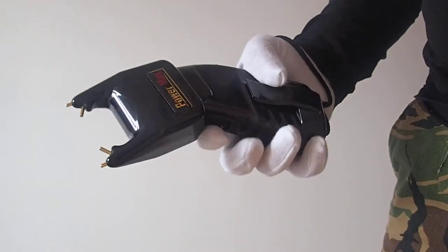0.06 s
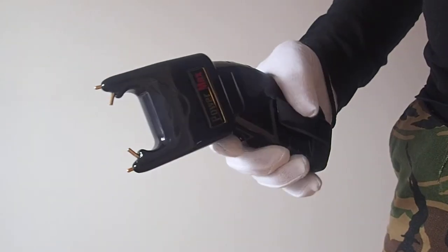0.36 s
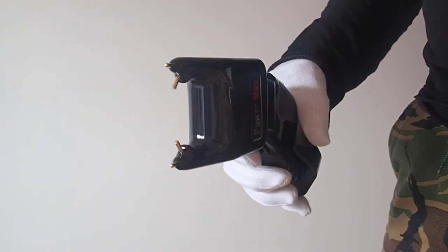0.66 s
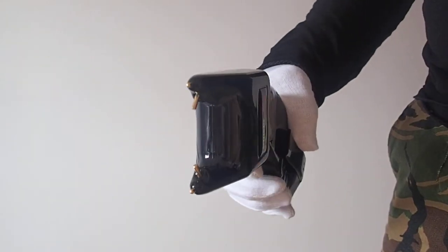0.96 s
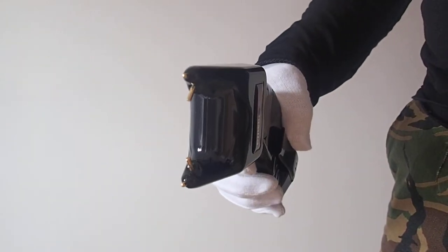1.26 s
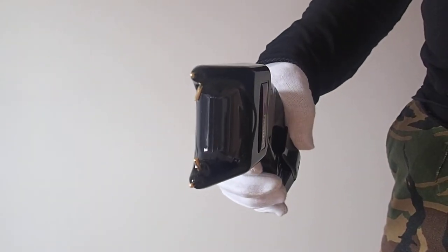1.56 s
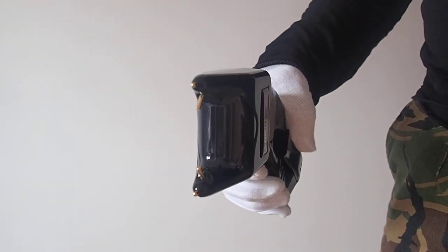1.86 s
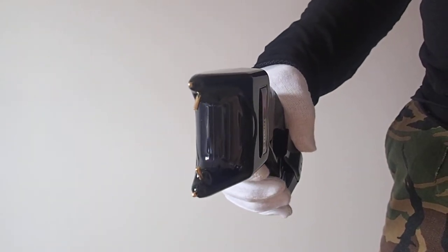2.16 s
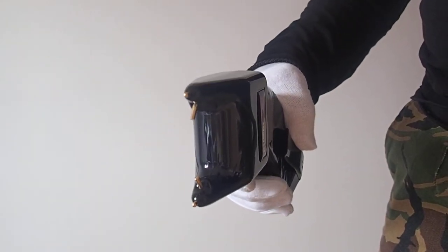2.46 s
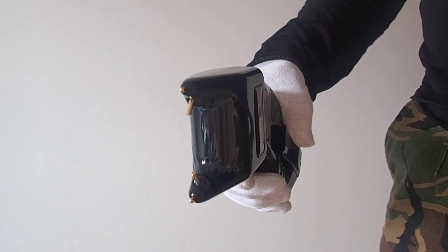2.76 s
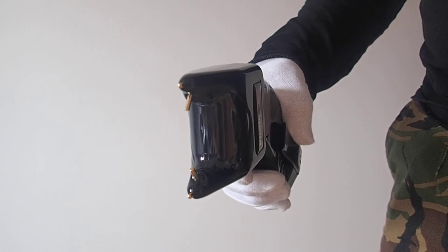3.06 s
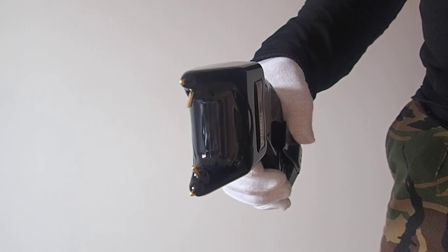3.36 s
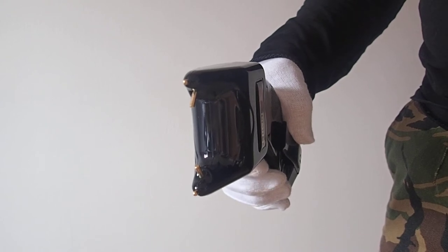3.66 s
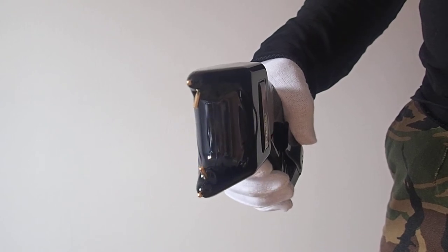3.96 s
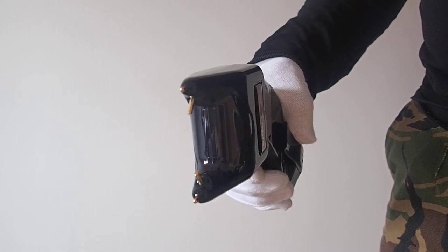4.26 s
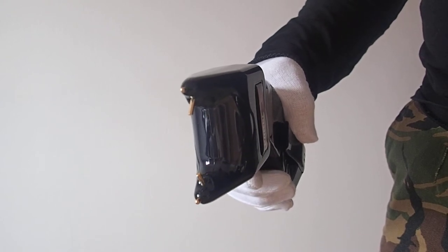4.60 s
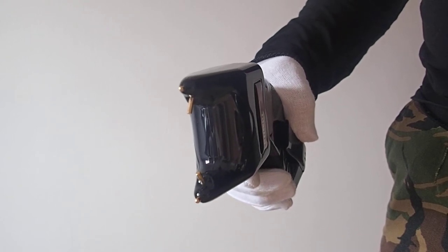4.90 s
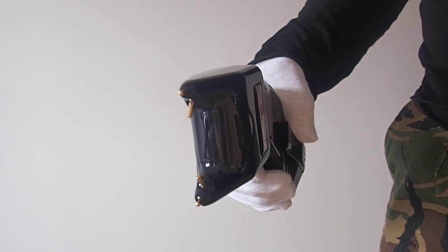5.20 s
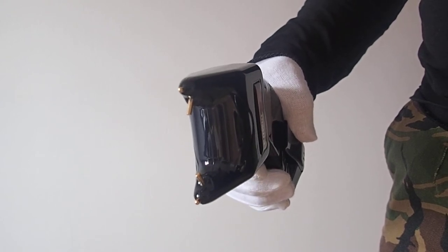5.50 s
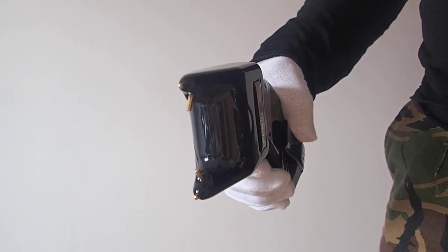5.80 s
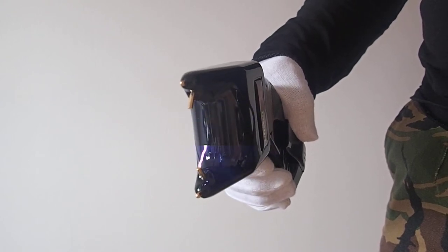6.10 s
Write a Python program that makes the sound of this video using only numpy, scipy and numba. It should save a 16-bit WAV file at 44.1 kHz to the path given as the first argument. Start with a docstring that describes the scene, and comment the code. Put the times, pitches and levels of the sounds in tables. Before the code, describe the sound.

Three brief bursts of sharp, rattling stun gun sparks, separated by pauses with faint hiss, each leaving a short room echo.

```python
"""A stun gun fires three short bursts close to a microphone in a small, hard-walled room.
Some forty sparks a second jump the gap; each crack glances off the casing and rings the room and
the microphone's ports. Trigger and grip click before each burst, over a steady hiss. A burst's first
crack overloads the recorder, whose gain control ducks, holds and recovers during the echo."""
import sys
import numpy as np
from scipy import signal
from scipy.fft import rfft, irfft
from scipy.io import wavfile
from numba import njit

SR = 44100
rng = np.random.default_rng(int(sys.argv[2]) if len(sys.argv) > 2 else 0)


def file_out(sig):
    """Save sig as 16-bit WAV at sys.argv[1]."""
    # one column per channel
    cols = np.atleast_2d(sig).T
    # limit, then scale
    lim = np.clip(cols, -1, 1)
    pcm = np.round(lim * 32767).astype(np.int16)
    wavfile.write(sys.argv[1], SR, pcm)


N = 270774


# hard cracks and their rattles: (time [s], crack level [dB], thud level [dB], rattle wait [s],
# rattle length [s], first recharge [s], rattle thud maximum [dB])
HARD_CRACKS = [(2.0285, 8.5, 18.5, .028, .235, .0205, 8), (2.3325, 1.7, 12.5, 0, 0, 0, 0),
               (3.7356, 8, 18.5, .039, .2, .0225, 10), (3.9893, -2.5, 5.5, .0225, .165, 0.029, -3),
               (5.9455, 6.5, 17, .0265, .153, .0229, 7.5)]

def discharges(slowing_s=.0003, jitter_s=.0014, full_charge_db=2, charge_tau_s=0.017,
               thud_fade_db_per_s=14, thud_spread_db=16, count=16):
    """Spark list (time [s], level [dB], thud [dB]): a hard crack, then the gap fires at each recharge."""
    k = np.arange(count)
    rows = []
    draws = rng.standard_normal((len(HARD_CRACKS), 2, count))
    for crack, (jitter, shortfall) in zip(HARD_CRACKS, draws):
        start_s, crack_db, thud_db, wait_s, length_s, recharge_s, max_thud_db = crack
        due_s = k * recharge_s + slowing_s * k * (k - 1) / 2  # each recharge takes longer
        times_s = start_s + wait_s + due_s + jitter_s * jitter
        gaps_s = np.abs(np.diff(times_s, prepend=start_s))
        charge = 1 - np.exp(-gaps_s / charge_tau_s)
        levels_db = full_charge_db + 20 * np.log10(charge)
        thuds_db = max_thud_db - thud_fade_db_per_s * due_s - thud_spread_db * np.abs(shortfall)
        rattle = np.c_[times_s, levels_db, thuds_db]
        rows.append((start_s, crack_db, thud_db))
        rows.extend(rattle[(due_s < length_s) & (times_s < N / SR)])
    return rows


# thud of a close spark on the microphone: (frequency [Hz], relative level [dB])
THUD_SPECTRUM = [(40, 1), (250, 2), (550, 2), (1200, 1), (2000, 4.5), (2800, -10.5), (3800, -3), (5000, -5),
                 (10000, -32)]

def sparks(smear_db=-6, smear_s=0.00033, thud_gain_db=1, thud_scatter_db=3, size=128, count=64):
    """Each spark is a shock, smeared by its crooked channel, and a thud, uneven on the two ports."""
    t = np.arange(size) / SR
    shocks, thuds = np.zeros(N), np.zeros((2, N))
    for (time_s, level_db, thud_db), noise in zip(discharges(), rng.standard_normal((count, size))):
        smear = unit(noise * (t > 0) * np.exp(-t / smear_s))
        shock = (t == 0) + undb(smear_db) * smear
        add(shocks, time_s, undb(level_db) * unit(shock))
        balance = undb(thud_scatter_db * noise[0] * np.array([[1], [-1]]))
        add(thuds, time_s, undb(thud_db + thud_gain_db) * unit(balance))
    return shocks, convolve(thuds, response(THUD_SPECTRUM))


# trigger and grip clicks: (time [s], level [dB], ring frequency [Hz])
TRIGGER_CLICKS = [(1.679, -33, 4450), (1.882, -28.5, 7360), (1.9987, -9, 8230), (3.619, -32, 5700),
                  (3.6368, -27.5, 7640), (3.704, -26.5, 5020), (5.815, -37, 5750), (5.826, -39, 6200),
                  (5.922, -27.5, 5300)]

def trigger(decay_s=0.00018, scrape_s=.0003, scrape_db=-6, size=256):
    """Plastic snaps: a very short ring plus a scrape."""
    t = np.arange(size) / SR
    clicks = np.zeros(N)
    noises = rng.standard_normal((len(TRIGGER_CLICKS), size))
    for (time_s, level_db, hz), noise in zip(TRIGGER_CLICKS, noises):
        scrape = undb(scrape_db) * unit(noise * np.exp(-t / scrape_s))
        add(clicks, time_s, undb(level_db) * unit(ring(t, hz, decay_s) + scrape))
    return clicks


# microphone port resonances, left then right: (frequency [Hz], level [dB])
PORT_RINGS = [(5650, -21.5), (5850, -12.5)]
# reflections off casing, hand, body and walls: (delay [s], level [dB])
REFLECTIONS = [(.00036, -7), (.00088, -5), (.0039, -9.5), (.0105, -25.5), (.0146, -28.5), (.0168, -23),
               (.0198, -16)]

def near_paths(port_decay_s=0.0007, skew_s=.000035, size=2048):
    """Direct sound rings each port; early reflections reach the two ports slightly apart."""
    t = np.arange(size) / SR
    decay = np.exp(-t / port_decay_s)
    paths = np.array([(t == 0) + undb(db) * unit(np.cos(2 * np.pi * hz * t) * decay)
                      for hz, db in PORT_RINGS])
    bins_hz = np.fft.rfftfreq(size, 1 / SR)
    for k, (delay_s, db) in enumerate(REFLECTIONS):
        arrival_s = delay_s + (-1) ** k * skew_s * np.array([[-.5], [.5]])
        paths += undb(db) * irfft(np.exp(-2j * np.pi * bins_hz * arrival_s))
    return paths


# echo width: (frequency [Hz], side re mid [dB])
ECHO_WIDTH = [(200, 2), (700, -9), (1300, -19), (2400, -76), (4400, -4), (8100, -8.5), (15000, 2)]
# wall colouring: (frequency [Hz], relative level [dB])
WALL_SPECTRUM = [(900, 1.5), (1500, -0.5), (2400, -0.5), (4100, -2), (5250, 6), (6600, 2), (8000, 0),
                 (13000, -5)]
# reverberation time: (frequency [Hz], T60 [s])
ECHO_T60 = [(300, .6), (1500, 0.86), (3000, 0.76), (5300, 0.6), (8000, 0.56), (11000, 0.41), (15500, 0.4)]
# lingering resonances: (frequency [Hz], relative level [dB])
ECHO_MODES = [(2283, -5), (3095, -7.5), (4667, -3.5), (4989, 3.5), (5119, -16), (5238, -12.5), (5700, -12),
              (5756, -5.5), (7760, -18.5)]

def room(wet_db=-2, build_s=0.019, clump_db=2.5, clump_samples=50, modes_db=-16, modes_t60_s=0.7):
    """Diffuse echo: builds in clumps of reflections, dies soonest in the treble, leaves modes ringing."""
    t = np.arange(SR) / SR
    mid, side = rng.standard_normal((2, SR))
    stereo = mid + tint(side, ECHO_WIDTH) * np.array([[1], [-1]])
    clump_levels_db = clump_db * rng.standard_normal(SR // clump_samples + 1)
    clumps = undb(np.repeat(clump_levels_db, clump_samples)[:SR])
    spectrum = rfft(tint(clumps * stereo, WALL_SPECTRUM))
    centres_hz, t60s_s = np.transpose(ECHO_T60)
    tail = 0
    for weights, t60_s in zip(np.eye(len(t60s_s)), t60s_s):
        band = irfft(spectrum * curve(np.c_[centres_hz, weights], SR))
        tail = tail + band * np.exp(-np.log(1000) * t / t60_s)
    modes = sum(undb(db) * ring(t, hz, modes_t60_s / np.log(1000)) for hz, db in ECHO_MODES)
    tail = unit(tail) + undb(modes_db) * unit(modes)
    return undb(wet_db) * unit(tail * (1 - np.exp(-t / build_s)))


# noise floor: (frequency [Hz], relative density [dB])
HISS_SPECTRUM = [(25, -16), (126, -2), (495, -1.5), (1170, -4), (1700, -7.5), (2150, -11), (2700, -19.5),
                 (3150, -14.5), (3650, -19.5), (3950, -26.5), (4600, -14.5), (5200, -10.5), (7200, -9),
                 (7950, -5), (9300, -13), (15500, -15)]

def hiss(left_db=-49.5, right_db=-52.33, shared_db=-9):
    """Steady microphone hiss and room air, mostly uncorrelated between channels."""
    noise = rng.standard_normal((3, N))
    stereo = tint(noise[:2] + undb(shared_db) * noise[2], HISS_SPECTRUM)
    return unit(stereo) * np.sqrt(N) * undb([[left_db], [right_db]])


def undb(db):
    """Decibels to gain."""
    return 10 ** (np.asarray(db) / 20)


def unit(x):
    """Scale to a mean channel energy of one."""
    return x / np.sqrt(np.mean(np.sum(x ** 2, axis=-1)))


def curve(points, size):
    """Interpolate (frequency [Hz], value) points at every FFT bin."""
    hz, value = np.transpose(points)
    return np.interp(np.log(np.fft.rfftfreq(size, 1 / SR) + 1), np.log(hz), value)


def tint(x, points):
    """Filter by (frequency [Hz], level [dB]) points."""
    return irfft(rfft(x) * undb(curve(points, x.shape[-1])), x.shape[-1])


def response(points, size=1024):
    """Minimum-phase, unit-energy impulse response from (frequency [Hz], level [dB]) points."""
    cepstrum = irfft(np.log(undb(curve(points, size))))
    cepstrum[1:size // 2] *= 2
    cepstrum[size // 2 + 1:] = 0
    return unit(irfft(np.exp(rfft(cepstrum)))[:size // 2])


def convolve(x, impulse):
    """Apply an impulse response; trim to N samples."""
    return signal.fftconvolve(np.atleast_2d(x), np.atleast_2d(impulse), axes=-1)[:, :N]


def add(track, time_s, sound):
    """Mix a sound into a track."""
    start = int(time_s * SR)
    part = sound[..., :track.shape[-1] - start]
    track[..., start:start + part.shape[-1]] += part


def ring(t, hz, decay_s):
    """Damped resonance, unit energy."""
    return unit(np.sin(2 * np.pi * hz * t) * np.exp(-t / decay_s))


# colour of a crack through the microphone's port: (frequency [Hz], relative level [dB])
CRACK_SPECTRUM = [(100, -52.5), (500, -30.5), (1200, -21), (2200, -17.5), (2700, -21.5), (3150, -13.5),
                  (4050, -20), (4600, -5.5), (5200, -2), (5800, -4), (6500, -4.5), (7900, -4), (9700, -8),
                  (15000, -11)]

def scene(spark_gain_db=22.5):
    """Sparks and trigger share the paths to the microphone; thuds and hiss add directly."""
    shocks, thuds = sparks()
    source = convolve(undb(spark_gain_db) * shocks + trigger(), response(CRACK_SPECTRUM))
    return convolve(source, near_paths()) + convolve(source, room()) + thuds + hiss()


@njit
def gain_control(x, limit, depth_db, attack_db_per_s, hold_s, release_db_per_s):
    """Gain falls while the output exceeds the limit, holds, then recovers."""
    y = np.empty_like(x)
    cut_db, wait_samples = 0., 0.
    for i in range(x.shape[1]):
        gain = 10 ** (-cut_db / 20)
        y[0, i], y[1, i] = gain * x[0, i], gain * x[1, i]
        if max(abs(y[0, i]), abs(y[1, i])) > limit:
            cut_db = min(cut_db + attack_db_per_s / SR, depth_db)
            wait_samples = hold_s * SR
        elif wait_samples > 0:
            wait_samples -= 1
        else:
            cut_db = max(cut_db - release_db_per_s / SR, 0.)
    return y


# dips in the recorder's response: (frequency [Hz], width [Hz], share removed [0-1])
NOTCHES = [(1884, 170, 1), (3365, 160, 0.66), (4860, 132, 0.99)]

def record(dry, ceiling=15.0, asymmetry=0.0088, lowpass_hz=15800):
    """Recorder: lopsided overload, notches, gain control too slow for the first crack, clip, low-pass."""
    saturated = ceiling * np.tanh(dry / ceiling)
    sound = saturated + asymmetry * saturated ** 2  # turns treble beats into a low body
    for hz, width_hz, share in NOTCHES:
        band = signal.lfilter(*signal.iirpeak(hz, hz / width_hz, fs=SR), sound)
        sound = sound - share * band
    ducked = gain_control(np.ascontiguousarray(sound), limit=0.41, depth_db=15.5,
                          attack_db_per_s=8000, hold_s=0.11, release_db_per_s=75)
    lowpass = signal.ellip(10, .2, 70, lowpass_hz, fs=SR, output="sos")
    return signal.sosfilt(lowpass, np.clip(ducked, -1, 1))


dry = scene()
out = record(dry)
file_out(out)
```